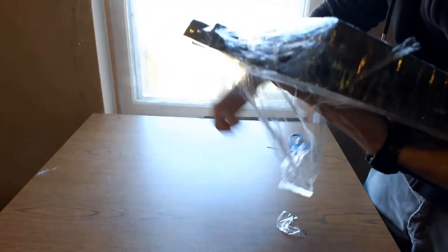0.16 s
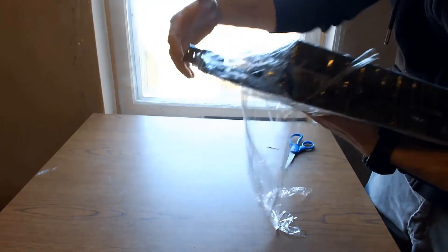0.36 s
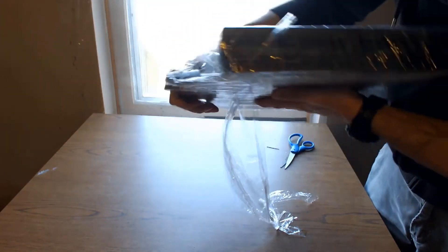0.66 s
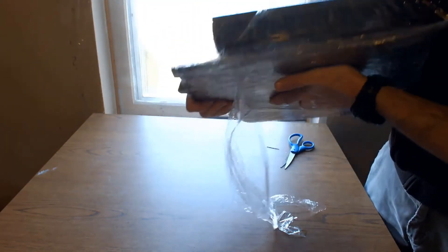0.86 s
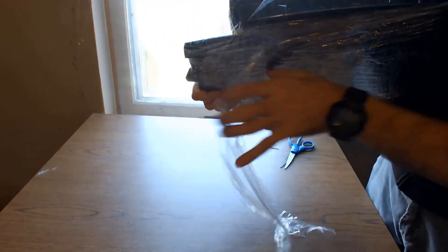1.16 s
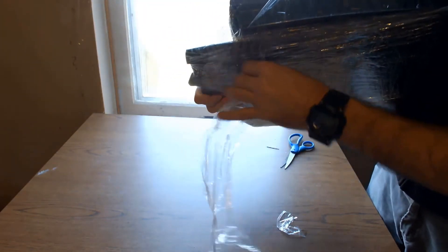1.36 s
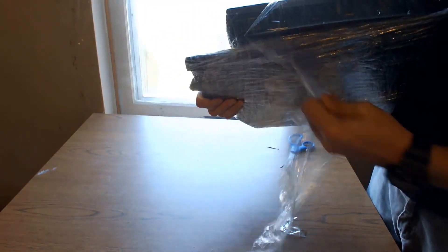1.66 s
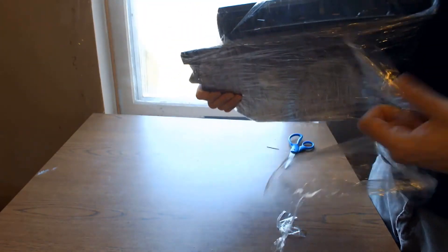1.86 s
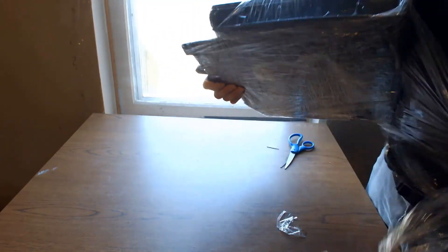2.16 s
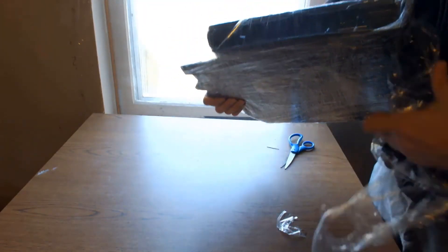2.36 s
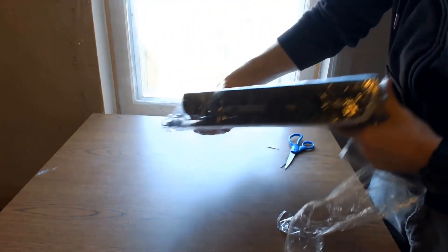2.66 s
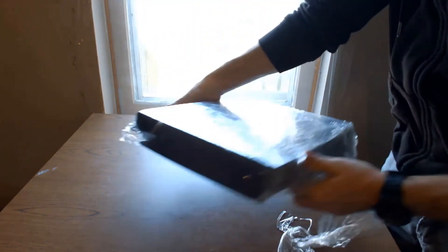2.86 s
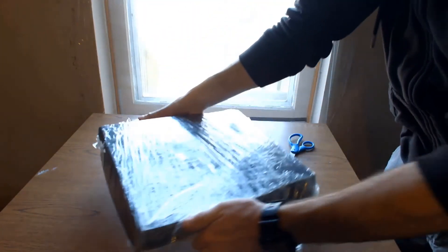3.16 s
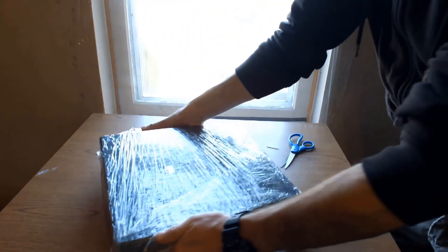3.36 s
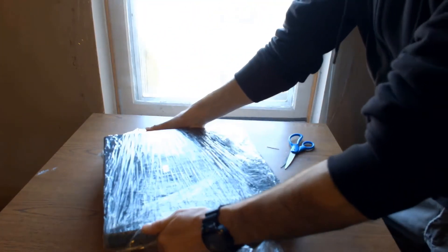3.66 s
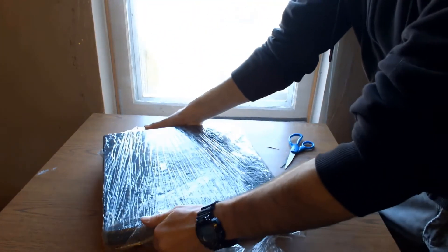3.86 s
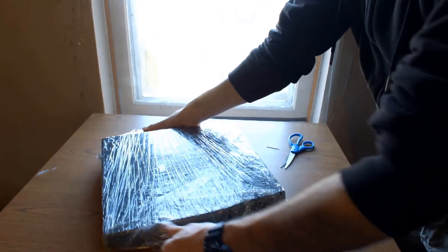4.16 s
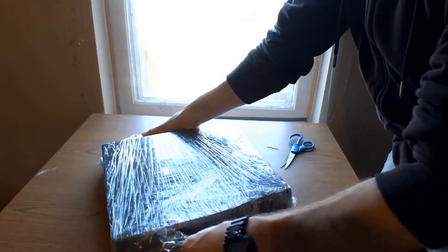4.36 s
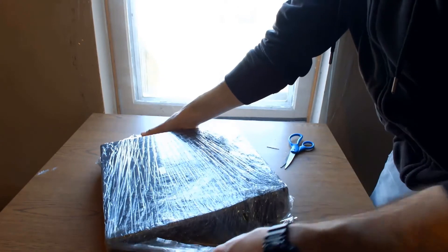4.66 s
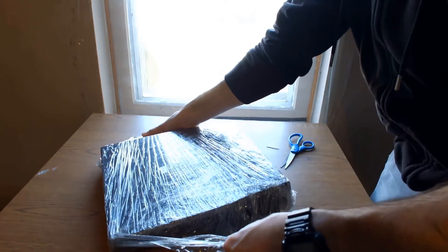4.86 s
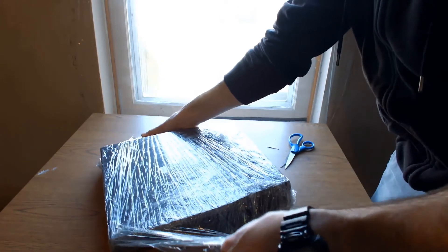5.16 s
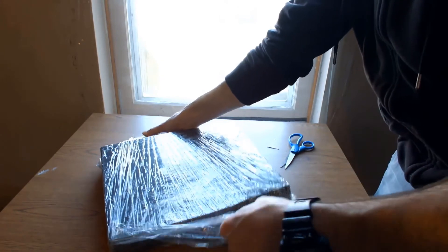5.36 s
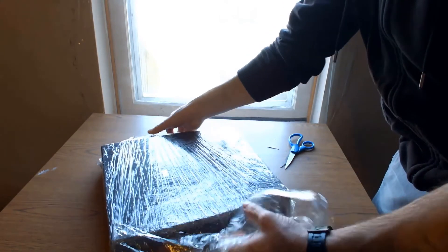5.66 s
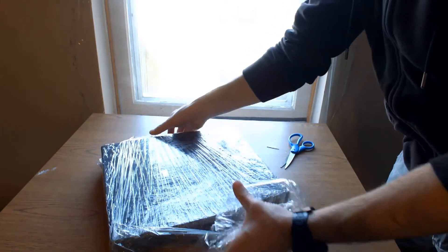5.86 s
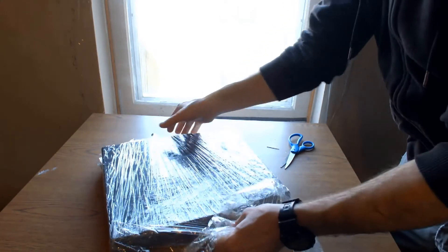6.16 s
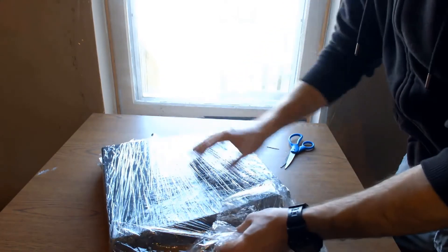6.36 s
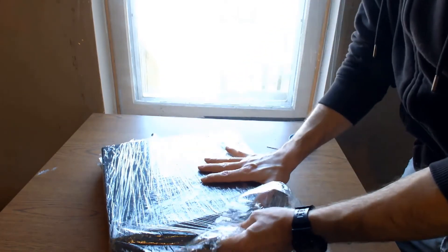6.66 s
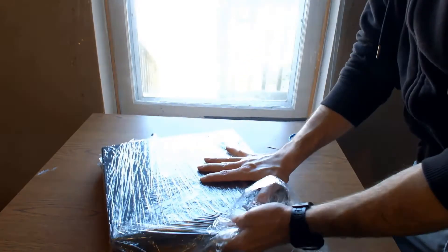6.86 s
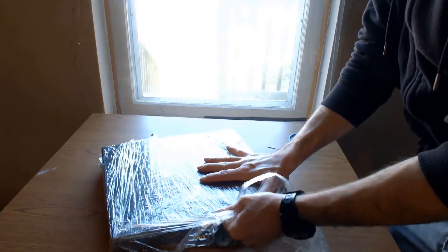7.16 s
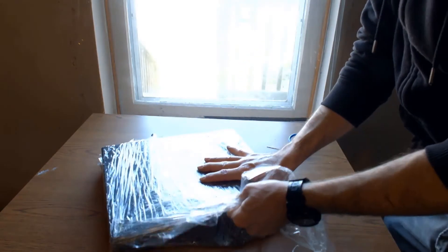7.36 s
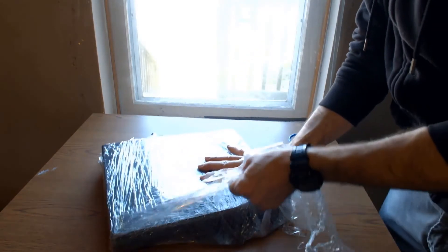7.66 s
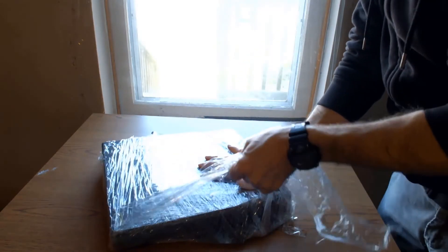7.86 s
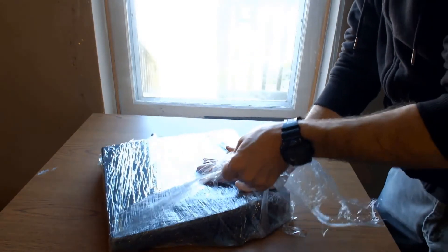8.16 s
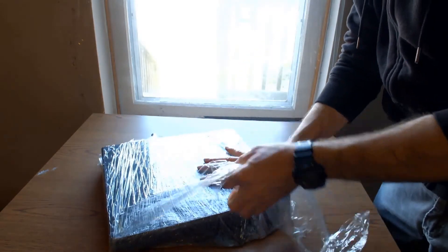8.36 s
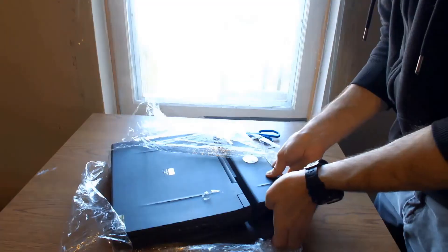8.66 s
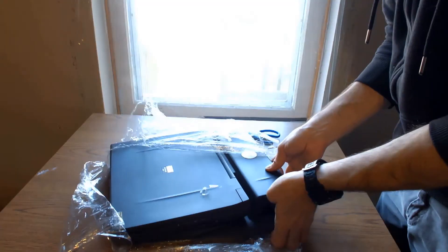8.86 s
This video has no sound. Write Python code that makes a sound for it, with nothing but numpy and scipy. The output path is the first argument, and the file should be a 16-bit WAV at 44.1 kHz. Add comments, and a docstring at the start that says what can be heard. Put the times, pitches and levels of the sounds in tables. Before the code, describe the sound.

Close, crisp rustling of thin stretch film pulled from a box on a wooden table, loudest midway, with sharp snaps, tiny squeaks and box knocks.

```python
"""Peeling stretch wrap

Stretch wrap is peeled by hand off a flat box on a wooden table, in a small room.
The clinging film lets go in thousands of tiny noise snaps; when taut it drums on the box.
Creases flip over as short wavelets, and where film slips it squeaks with gliding, roughened partials.
The hands bump the box softly; the box knocks now and then, hardest near the end: fading tones and clicks.
Changing room echoes follow these sounds, over a faint steady hiss of film rubbing, made of noise."""
import sys
import numpy as np
from scipy import signal
from scipy.fft import rfft, irfft, next_fast_len
from scipy.io import wavfile
from scipy.ndimage import uniform_filter1d, map_coordinates

SR = 44100
rng = np.random.default_rng(int(sys.argv[2]) if len(sys.argv) > 2 else 0)


def materialize(psi):
    """Save the field psi as 16-bit PCM at rate SR to the path in sys.argv[1].

    A 1-D psi becomes a single channel; in a 2-D psi each row is a channel.
    """
    bounded = np.clip(np.atleast_2d(psi).T, -1, 1)
    quanta = np.round(bounded * 32767).astype(np.int16)
    wavfile.write(sys.argv[1], SR, quanta)


N = 397341  # length in samples

# All levels are relative: the filters and mixing steps below still act on them.
# Pulls that peel the film off; drum and fizz are relative to the crinkle, swell runs from start to end:
# start_s, length_s, crinkle_db, swell_db, drum_db, fizz_db
PULLS = [(0, .08, -41, 0, -7, -0.5), (.48, .05, -43, 8, -5, -5.5), (.98, .1, -44, 0, -6, 0),
         (1.114, .14, -37, -2.5, -11, -2), (1.311, .15, -37, 3, -9, 0.5), (1.46, .245, -27.5, 0, -10, 1),
         (1.68, .49, -27.5, -4, -7, 0), (2.17, .33, -38.5, -5, -7, 4), (2.519, .05, -36, 0, -4, 3),
         (2.64, .32, -36.5, 2, -8.5, -1), (2.969, .15, -31, -5, -9, -3), (3.17, .21, -44, 0, -4, -7),
         (3.38, .12, -33, -3, -5, -11), (3.471, .5, -35.5, 2, -9, -9), (3.96, .38, -28.5, 3, -7, -5),
         (4.32, .4, -24, 1.5, -2, -9), (4.72, .15, -24, -2, -8, -5), (4.86, .17, -28.5, -2, -16, -6),
         (5.025, .1, -25, 0, -12, -6), (5.13, .18, -32, -6, -9, -1.5), (5.339, .16, -33, -5, -7, -0.5),
         (5.6, .52, -37, 5, -5, -3), (6.119, .19, -28, 2, -11, -3), (6.519, .36, -33, 7, -8, -4.5),
         (6.88, .4, -30, 0, -13, -4), (7.29, .11, -29, 0, -4, -1.5), (7.41, .21, -29, -1, -20, 1),
         (7.6, .26, -32, -4, -8, 1), (7.89, .19, -34.5, 1, -13, -2), (8.23, .22, -34.5, 3, -13, -5),
         (8.521, .15, -37, 2, -7, 1), (8.81, .2, -36, 0, -8, -3)]
TAKE_UP_SHARE, LET_GO_S = .08, .025  # time constants: build-up as a share of the pull's length, dying away
# A fold crumples all at once; fizz is relative to the crinkle: start_s, crinkle_db, fizz_db
CRUMPLES = [(1.195, -37, -1), (2.01, -28, -8), (2.335, -33, -3), (2.78, -32, -2), (2.995, -32, -5),
            (3.821, -30, -1), (3.915, -29, -14), (4.03, -25, -13.5), (4.105, -24, -6), (4.254, -28, -6),
            (4.81, -27, -8), (5.085, -23, -8), (5.245, -29, -2), (5.935, -31, -5), (6.125, -26, -7),
            (6.235, -25, -6), (6.415, -31, -7), (6.58, -26, -10), (6.69, -28, -6), (6.825, -24, -10),
            (6.905, -31, 0), (7.025, -26, -7), (7.175, -26, -5), (7.829, -25, -7), (8.048, -28, -6),
            (8.386, -30, -8)]
CRUMPLE_RISE_S, CRUMPLE_DRUM_DB = .009, -9  # time to its peak; drumming relative to crinkle
# Loose film rustling in the hands all along: time_s, level_db
SLACK_RUSTLE = [(0.1, -54), (.32, -58), (.53, -47), (.66, -50), (.9, -45), (1.05, -44), (1.29, -49),
                (2.4, -40), (2.62, -51), (2.9, -40), (3.33, -45), (5.3, -40), (5.6, -42), (6.5, -46),
                (7.6, -38), (8.2, -47), (8.5, -41), (9, -42)]
SLACK_DRUM_DB, SLACK_FIZZ_DB = -9, -1  # its drumming and fizz, relative to its crinkle
# Colours of the three kinds of tiny snap: pitch_hz, level_db (per Hz)
DRUM_COLOUR = [(25, -41), (70, -23), (130, -14.5), (250, -8.5), (330, -1), (500, -1.5), (680, -1),
               (1050, 2), (1400, 1), (2200, -3.5), (5000, -74.5)]
CRINKLE_COLOUR = [(300, -40.5), (800, -17), (1400, -2), (2200, 1), (3300, 2.5), (3900, -0.5), (4900, -2),
                  (6000, -9.5), (8000, -16.5), (16000, -38.5)]
FIZZ_COLOUR = [(1500, -31), (4000, 2.5), (6200, 1), (8000, 0), (11000, -1.5), (14500, -2), (16000, -5.5)]
GRAIN_SPREAD_DB = 5.2  # how unequal the drum and fizz snaps are when the film is taut
# Single creases that snap through: start_s, level_db, pitch_hz
SNAPS = [(0.4429, -21.5, 1380), (0.4449, -17.5, 3950), (.601, -16.5, 6770), (0.8695, -12, 4020),
         (1.1944, -10.5, 3820), (1.199, -22, 3000), (1.524, -7.5, 4200), (1.563, -18, 7450),
         (1.626, -15, 4000), (1.648, -8, 8060), (1.701, -12, 4500), (2.009, -16, 2480), (3.921, -15, 1700),
         (3.986, -14, 1290), (4.337, -13.5, 903), (4.366, -9, 1100), (4.432, -10.5, 805), (4.466, -6, 2400),
         (4.557, -4.5, 2000), (4.585, -9, 1300), (4.621, -3, 3140), (4.639, -12, 1670), (4.713, -15, 2460),
         (5.031, -7.5, 3900), (5.091, -6, 1920), (5.2476, -5.5, 5400), (5.257, -13, 6000),
         (6.128, -18, 2840), (6.25, -21, 3200), (6.416, -16, 2380), (6.584, -10.5, 1937),
         (6.696, -10.5, 1330), (6.805, -4, 2500), (6.8393, -3.5, 2970), (6.911, -8, 3900),
         (7.034, -14, 3010), (7.083, -9.5, 2860), (7.187, -9, 3130), (7.301, -7.5, 1550), (7.84, -9, 3800),
         (8, -14, 5000), (8.0508, -3.5, 3950)]
# Film slipping on film or on the table; roughness runs from 0 to 1, fall_db is the drop one octave off centre:
# start_s, length_s, first_hz, settled_hz, level_db, fade_db, first_rough, settled_rough, fall_db, centre_hz
SQUEAKS = [(.542, 0.021, 1698, 1860, -17.5, 3, 0.5, 1, -8, 1800),
           (.684, .052, 2202, 3020, -19.5, 10.5, 0.96, 0.1, -8, 3250),
           (3.385, .13, 922, 903, -38, 10, 0.78, 0.54, -3, 1200),
           (5.341, 0.051, 925, 1120, -24, 3, 0.26, 0.13, -4, 2150),
           (7.433, 0.054, 3500, 3355, -24, 4, 0.97, .45, -12, 3900),
           (7.438, 0.06, 4800, 4450, -24.5, 2, 0.92, .45, -12, 4500),
           (7.488, 0.0167, 3500, 3950, -24.5, 2, .2, 0.2, -8, 3900),
           (7.511, .024, 5020, 6620, -26, 9, 0.2, .2, -19, 5700),
           (7.53, 0.0293, 4510, 4850, -26.5, 2, .35, .08, -9, 3900),
           (7.56, 0.014, 3330, 3320, -23.5, 1, 0.15, 0.1, -17, 3900),
           (7.567, .046, 6600, 6310, -26.5, 1, .2, .08, -17, 5700),
           (8.55, 0.044, 4310, 4620, -28.5, 14, 0.78, 0.94, -10, 4500)]
SQUEAK_ATTACK_S, SETTLE_SHARE = 0.0038, .36  # onset time constant; pitch settling as a share of the length
# The box knocks: start_s, level_db, edge_click_db (relative to the knock)
KNOCKS = [(0.555, -18, -18.5), (0.811, -26.5, -7.5), (.869, -24.5, 5), (2.703, -21, -22), (3.389, -29, -7),
          (5.093, -10.5, -12), (6.1259, -15, -7), (7.299, -18, 1), (8.05, -14.5, 4), (8.767, -1, -18)]
# Ringing tones of the box on the table; t60_s is the time to fall by 60 dB: pitch_hz, level_db, t60_s
BOX_MODES = [(211, -24, .2), (353, -19.5, 0.21), (434, -13, 0.14), (520.4, -9, 0.13), (690, -7, 0.034),
             (875, 2, 0.027), (990, 0, 0.017), (1233, -3, 0.031), (1473, -2.5, 0.042), (1680, -14, 0.026),
             (2090, -8.5, 0.022), (2560, -10.5, 0.03)]
# Colour of the contents rattling after a knock: pitch_hz, level_db (per Hz)
RATTLE_COLOUR = [(100, -17), (400, -2.5), (1400, 2), (2900, -3.5), (5000, -13), (16000, -42)]
# Soft bumps of the hands: start_s, level_db, pitch_hz
BUMPS = [(1.789, -38, 165), (2.526, -30.5, 163), (2.554, -40, 140), (5.088, -29, 135), (5.495, -40, 65),
         (6.19, -37, 62), (7.305, -48, 95.1), (8.045, -41, 150)]
# Where the hands work, as how much later the sound reaches the left microphone: time_s, lag_s
BEARING = [(0, 2e-5), (.7, 1e-5), (1.3, 0), (1.8, 3e-5), (2.4, 5e-5), (2.8, 2e-5), (3.2, 0), (4.2, -1e-5),
           (5, 0)]
# How long the room's echoes take to fall by 60 dB: pitch_hz, t60_s
ROOM_DECAY = [(100, 0.25), (500, 0.34), (3000, 0.46), (8000, 0.54), (16000, 0.34)]
# How alike the left and right echoes are: pitch_hz, likeness (no unit)
ECHO_LIKENESS = [(50, 1), (250, 1), (1000, 0.69), (2000, 0.41), (4000, 0.2), (8000, 0.11), (16000, 0.33)]
# Colour of the steady hiss of film rubbing: pitch_hz, level_db (per Hz)
RUBBING_COLOUR = [(20, -15.5), (70, -11), (200, -6.5), (1000, -11), (16000, -27.5)]
RUBBING_DB, TOP_HZ = -53, 15950  # level of the rubbing hiss; nothing is kept from this pitch up


def film():
    """Peeling film: low drumming through the box, crinkling creases and the fizz of the parting layers."""
    drum_db, crinkle_db, fizz_db = effort()
    drum_grains = crackle(rate=1000, spread_db=GRAIN_SPREAD_DB, life=0.00035, clump_db=2.0,
                          width=0.052, level_db=drum_db)
    crinkle_grains = crackle(rate=1700, spread_db=3.5, life=0.00025, clump_db=2.57,
                             width=0.22, level_db=crinkle_db)
    fizz_grains = crackle(rate=2800, spread_db=GRAIN_SPREAD_DB, life=0.00027, clump_db=1.2,
                          width=0.88, level_db=fizz_db)
    drum = amp(drum_db - 1.0) * unit(coloured(drum_grains, DRUM_COLOUR))
    crinkle = amp(crinkle_db - 2.0) * shifting(coloured(crinkle_grains, CRINKLE_COLOUR), depth_db=0.5)
    fizz = amp(fizz_db - 1.0) * unit(coloured(fizz_grains, FIZZ_COLOUR))
    fizz = fizz * amp([[.6], [-.6]])  # leans left
    return in_room(drum + crinkle + fizz, wet_db=-2)


def effort():
    """Levels in dB of drumming, crinkle and fizz: slack rustle, pulls and crumples add up in power."""
    t = np.arange(N) / SR
    slack_db, = curves(SLACK_RUSTLE, t)
    power = (amp([[SLACK_DRUM_DB], [0], [SLACK_FIZZ_DB]]) * amp(slack_db)) ** 2
    t = t[:SR]
    for s, length, db, swell_db, drum_db, fizz_db in PULLS:
        hold = amp(db + swell_db * (np.minimum(t / length, 1) - .5))
        take_up = 1 - np.exp(-t / (TAKE_UP_SHARE * length))
        let_go = np.exp(-np.maximum(t - length, 0) / LET_GO_S)
        pull = take_up * hold * let_go
        add(power, max(s, 0), (amp([[drum_db], [0], [fizz_db]]) * pull) ** 2)
    burst = t / CRUMPLE_RISE_S * np.exp(1 - t / CRUMPLE_RISE_S)
    for s, db, fizz_db in CRUMPLES:
        add(power, s, (amp([[CRUMPLE_DRUM_DB], [0], [fizz_db]]) * amp(db) * burst) ** 2)
    return 10 * np.log10(power)


def crackle(rate, spread_db, life, clump_db, width, level_db, crowding=.45, size=64):
    """Tiny fading noise snaps of varied size and direction; a harder pull crowds them closer.

    rate is the base number a second, life a fade time constant in s, size a length in samples.
    """
    crowd_db = np.clip(crowding, 0, 1) * 2 * (level_db - level_db.mean())
    density = np.maximum(amp(crowd_db), 1)
    count = int(rate * density.sum() / SR)
    picks = rng.random(count) * density.sum()
    start = np.searchsorted(np.cumsum(density), picks).clip(0, N - 1)
    # slack film only brushes softly: its grains are more alike in size
    taut = np.interp(level_db[start], [-58, -38], [.3, 1])
    level = taut * spread_db * np.minimum(rng.standard_normal(count), 2.3)
    level = level + clump_db * wobble(70, N)[start]
    fade = np.exp(-np.arange(size) / (life * SR))
    # crowded snaps are each made smaller
    grain_gain = (amp(level) / np.sqrt(density[start]))[:, None]
    mid, side = rng.standard_normal((2, count, size)) * fade * grain_gain
    where = (start[:, None] + np.arange(size)).ravel()
    left, right = [np.bincount(where, (mid + sign * width * side).ravel(), N + size)[:N] for sign in (1, -1)]
    return np.array([left, right])


def shifting(x, depth_db, size=7):
    """Folds form and vanish, so the film's resonances wander in pitch and time."""
    z = signal.stft(x, nperseg=512)[2]
    field = uniform_filter1d(rng.standard_normal(z.shape[1:]), size * 2, 0)  # smooth over pitch
    field = uniform_filter1d(field, size, 1)  # smooth over time
    return unit(signal.istft(z * amp(depth_db * unit(field)), nperseg=512)[1][:, :N])


def snaps(tick=0.094):
    """A crease flips over: a wavelet of about two cycles with a little broadband tick."""
    track, t = np.zeros(N), np.arange(SR // 200) / SR
    for s, db, hz in SNAPS:
        u = t * hz / .7  # the envelope peaks after 0.7 of a cycle
        envelope = (u * np.exp(1 - u)) ** 2
        wave = np.sin(2 * np.pi * hz * t) + tick * rng.standard_normal(len(t))
        add(track, s, amp(db) * envelope * wave)
    return in_room(radiated(track, low_hz=590), wet_db=-4.0)


def squeaks(jitter=0.0593, scatter=1400):
    """Stick and slip glides to a settled pitch: clean slip is a tone, rough slip smears it into a scrape."""
    track, k = np.zeros(N), np.arange(1, 9)[:, None]  # k numbers the partials
    for (s, length, first_hz, settled_hz, db, fade_db,
         first_rough, settled_rough, fall_db, centre_hz) in SQUEAKS:
        t = np.arange(int(length * SR)) / SR
        unsettled = np.exp(-(t / (SETTLE_SHARE * length)) ** 2)
        hz = settled_hz + (first_hz - settled_hz) * unsettled
        rough = np.clip(settled_rough + (first_rough - settled_rough) * unsettled, 0, 1)
        shaky_hz = hz * (1 + jitter * rough * wobble(502, len(t)))
        phase = 2 * np.pi * np.cumsum(shaky_hz) / SR
        octaves_off = np.abs(np.log2(k * hz / centre_hz))
        weight = amp(fall_db * octaves_off ** 1.5) * (k * hz < TOP_HZ)
        rates = scatter * np.sqrt(k[:, 0])
        smear = np.array([wobble(rate, len(t)) + 1j * wobble(rate, len(t)) for rate in rates])
        clean = (1 - rough) ** k ** 1.3  # the higher partials blur first
        blend = np.sqrt(clean) + np.sqrt((1 - clean) / 2) * smear
        partials = np.real(blend * np.exp(1j * k * phase))
        tone = np.sum(weight * partials, axis=0) / np.linalg.norm(weight, axis=0)
        envelope = amp(db - fade_db * (t / length) ** 2) * (1 - np.exp(-t / SQUEAK_ATTACK_S))
        add(track, s, envelope * unit(tone) * signal.windows.tukey(len(t), .1))
    return in_room(radiated(track, low_hz=700, order=3), wet_db=-0.5)


def box(click_t60=0.026, rattle_db=-19, rattle_t60=.18, bump_t60=0.078, bump_rise=0.0033):
    """Hard knocks ring the box, click its edge and shake its contents; hands give only a dull push."""
    knocks, bumps, shake = np.zeros((3, N))
    t = np.arange(SR // 3) / SR
    for s, db, click_db in KNOCKS:
        ring = np.zeros(len(t))
        for hz, level, t60 in BOX_MODES:
            # each mode starts on its own phase as the contact spreads
            tone = np.sin(2 * np.pi * (hz * t + rng.random()))
            ring += amp(level + rng.normal(0, 1) - 60 * t / t60) * tone
        click = amp(click_db - 60 * t / click_t60) * rng.standard_normal(len(t))
        add(knocks, s, amp(db - 8.5) * (ring * (1 - np.exp(-t / 0.00045)) + click))
        add(shake, s, amp(db + rattle_db - 60 * t / rattle_t60))
    for s, db, hz in BUMPS:
        envelope = amp(db - 60 * t / bump_t60) * (1 - np.exp(-t / bump_rise))
        add(bumps, s, envelope * np.sin(2 * np.pi * hz * t))
    uneven_noise = rng.standard_normal((1, N)) * amp(3.7 * wobble(300, N))
    rattle = shake * unit(coloured(uneven_noise, RATTLE_COLOUR))
    near = radiated(knocks, low_hz=228, order=4) + rattle + radiated(bumps, low_hz=50)
    return in_room(near, wet_db=-1.0)


def radiated(track, low_hz, order=2):
    """A small surface sends out little bass; both channels hear it alike."""
    sound = signal.sosfilt(signal.butter(order, low_hz, "highpass", fs=SR, output="sos"), track)
    return np.array([sound, sound])


def off_centre(x):
    """Work done to one side reaches the far microphone a little late."""
    n = np.arange(N)
    lag, = curves(BEARING, n / SR)
    return np.array([map_coordinates(x[0], [n - lag * SR], order=5), x[1]])


def in_room(x, wet_db, size=4000):
    """Stereo x with its echoes, whose pattern keeps changing as hands and film move."""
    wet, mono = np.zeros((2, N)), x.mean(0)
    for i in range(0, N, size):
        block = mono[None, i:i + size]
        if np.abs(block).max() > 1e-6:  # skip silence
            tail = echoes(early_db=3.5, early_t60=0.056)
            add(wet, i / SR, signal.fftconvolve(block, tail, axes=1))
    return x + amp(wet_db) * wet


def echoes(early_db, early_t60):
    """A noise echo tail of unit energy: quick returns off the table and window, then the walls."""
    hz, t, z = signal.stft(rng.standard_normal((2, SR // 3)), SR, nperseg=256)
    walls = amp(-60 * t / along(ROOM_DECAY, hz)[:, None])
    quick = amp(early_db - 60 * t / early_t60)
    z = z * (walls + quick)
    alike = np.clip(along(ECHO_LIKENESS, hz), -1, 1)[:, None]
    mid, side = signal.istft(z * np.sqrt([1 + alike, 1 - alike]), SR, nperseg=256)[1]
    tail = np.pad([mid + side, mid - side], ((0, 0), (SR // 1000, 0)))  # starts 1 ms late
    return tail / np.sqrt(np.sum(tail ** 2) / 2)


def rubbing():
    """A faint steady hiss of film rubbing: coloured noise, drawn separately for each channel."""
    return amp(RUBBING_DB) * unit(coloured(rng.standard_normal((2, N)), RUBBING_COLOUR))


def amp(db):
    """Decibels to gain."""
    return 10 ** (np.asarray(db) / 20)


def unit(x):
    """x at an rms (average strength) of 1."""
    return x / np.sqrt(np.mean(x ** 2) + 1e-20)


def along(points, hz):
    """(Hz, value) points read on a log axis."""
    f, v = np.transpose(points)
    return np.interp(np.log(hz + 1), np.log(f), v)


def curves(rows, t):
    """Each column after the time, read at times t."""
    s, *cols = np.transpose(rows)
    return [np.interp(t, s, c) for c in cols]


def wobble(rate, size):
    """A smooth random curve with rate knots a second."""
    knots = rng.standard_normal(int(size * rate / SR) + 4)
    return map_coordinates(knots, [np.arange(size) * rate / SR])


def add(track, s, sound):
    """Mix a sound into a track from time s on."""
    part = track[..., round(s * SR):][..., :sound.shape[-1]]
    part += sound[..., :part.shape[-1]]


def coloured(x, spectrum, size=4096):
    """x through a filter that never acts ahead of time, so that clicks keep their sharp fronts."""
    cepstrum = irfft(np.log(amp(along(spectrum, np.fft.rfftfreq(size, 1 / SR)))))
    # folding the cepstrum gives the filter its earliest possible response
    cepstrum[1:size // 2] *= 2
    cepstrum[size // 2 + 1:] = 0
    response = irfft(np.exp(rfft(cepstrum)))
    return signal.fftconvolve(x, response[None], axes=1)[:, :N]


def scene():
    """Film and box, a touch louder on the left, over the faint steady hiss of film rubbing."""
    work = off_centre(film() + snaps() + squeaks() + box())
    return work * amp([[.2], [-.2]]) + rubbing()


def record(dry):
    """Keep only what lies below the band limit."""
    size = next_fast_len(N + SR // 2)
    keep = np.fft.rfftfreq(size, 1 / SR) < TOP_HZ
    return irfft(rfft(dry, size) * keep, size)[:, :N]


dry = scene()
out = record(dry)
materialize(out)
```